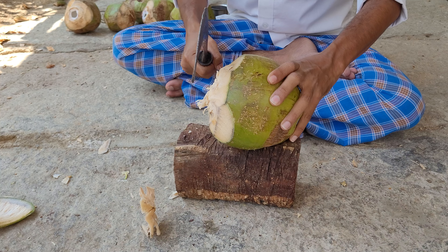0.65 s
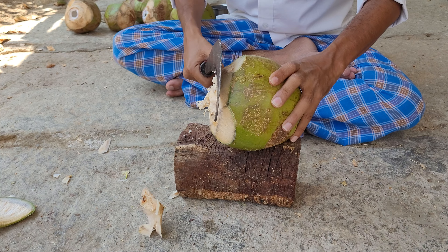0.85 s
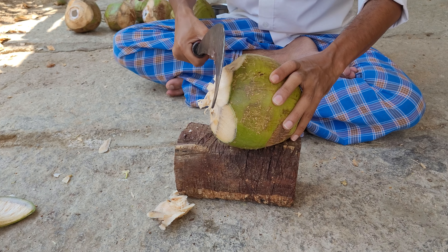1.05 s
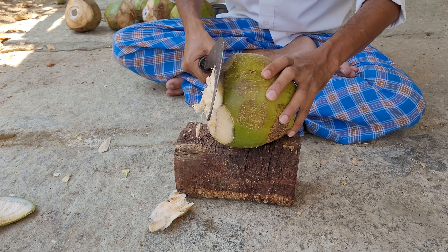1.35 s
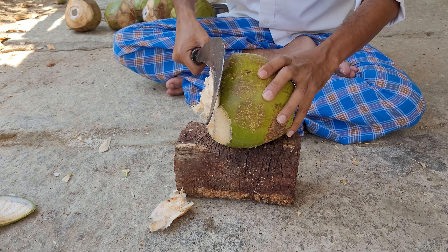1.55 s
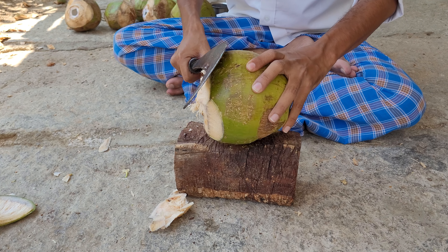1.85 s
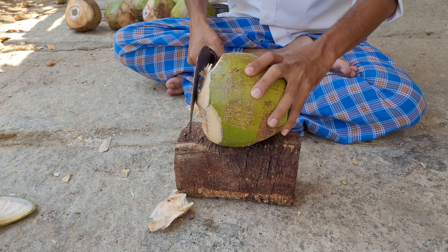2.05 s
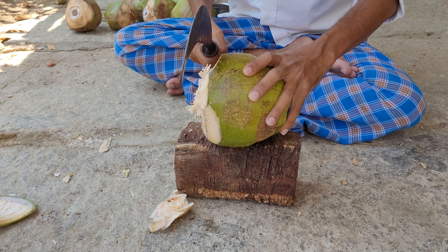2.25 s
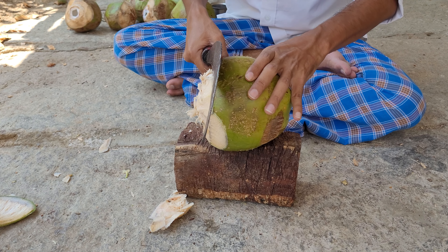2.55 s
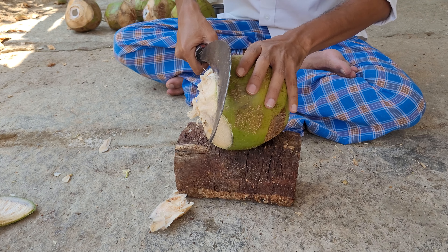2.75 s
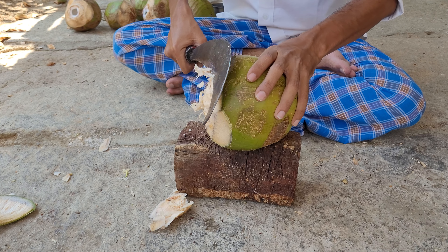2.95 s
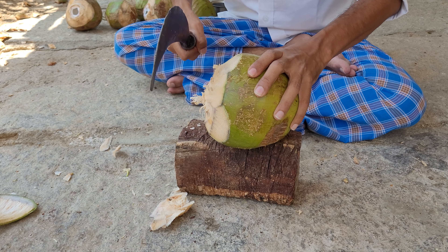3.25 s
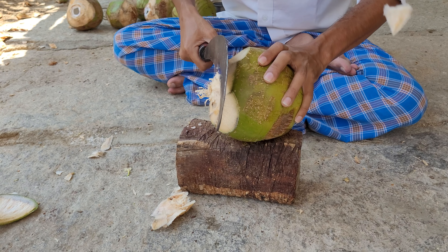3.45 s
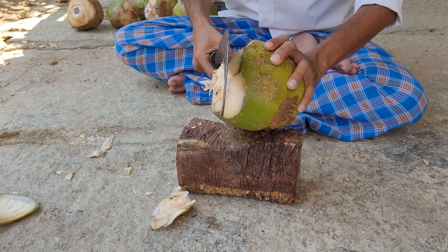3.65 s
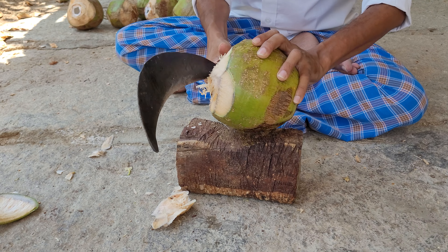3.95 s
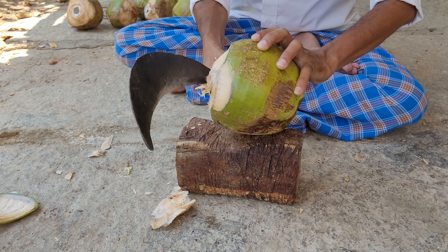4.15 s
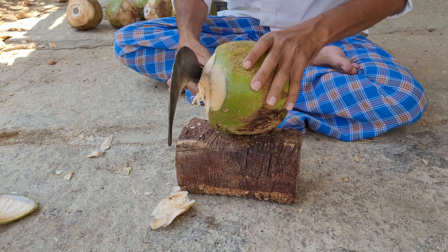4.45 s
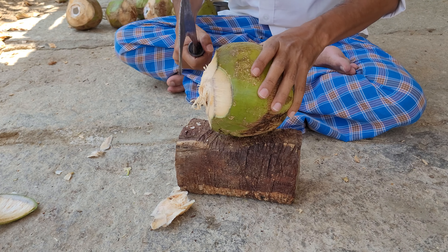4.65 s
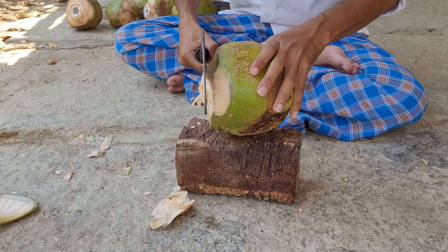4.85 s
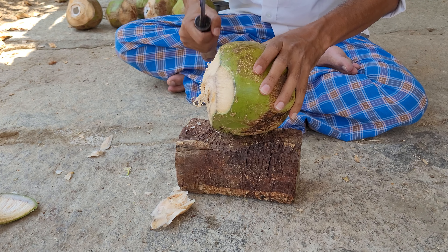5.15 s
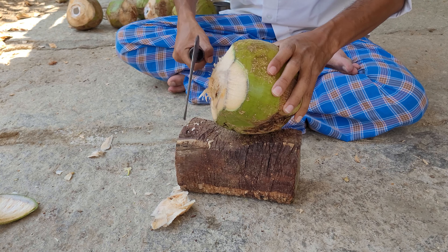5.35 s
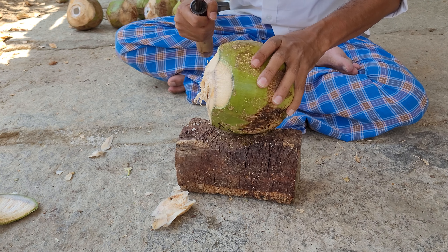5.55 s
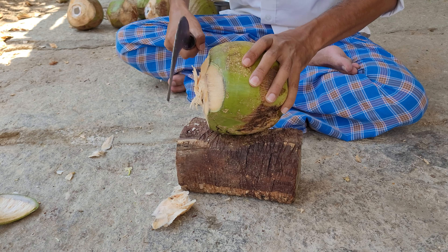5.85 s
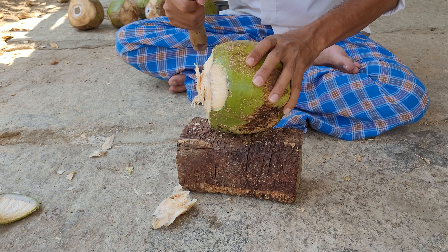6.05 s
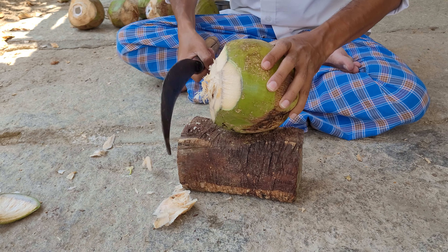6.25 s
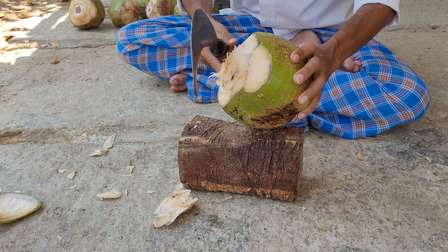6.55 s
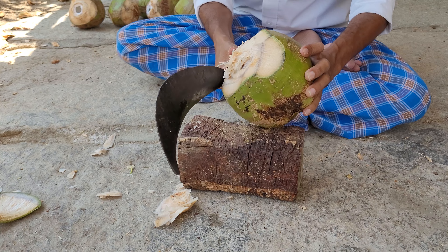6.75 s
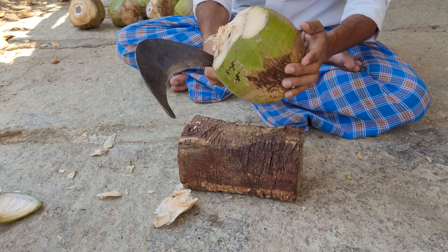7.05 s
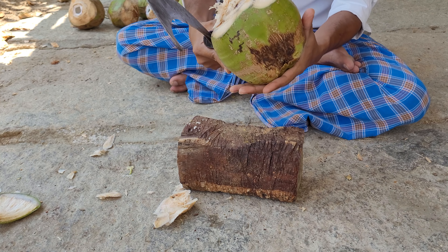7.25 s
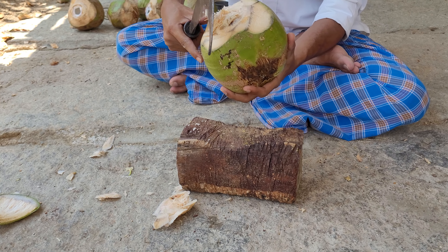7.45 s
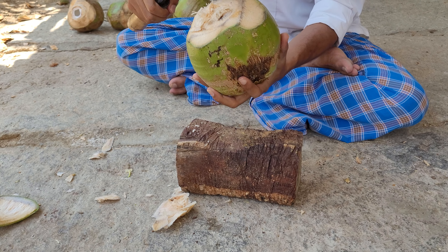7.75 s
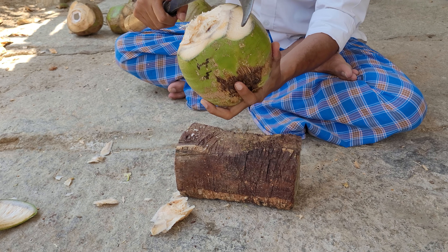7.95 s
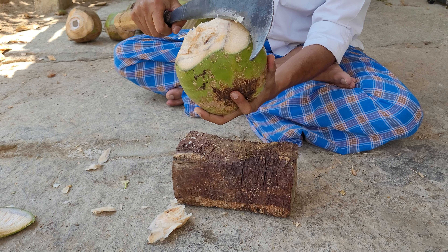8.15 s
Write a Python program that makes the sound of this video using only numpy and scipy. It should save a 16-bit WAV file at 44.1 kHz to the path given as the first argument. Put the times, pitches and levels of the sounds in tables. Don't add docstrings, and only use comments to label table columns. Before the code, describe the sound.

Close stereo microphone outdoors, dry with short wall reflections. Crisp, lumpy husk tears coincide with low hollow thuds from a liquid-filled nut and log, with brief dull steel rings. Between widely spaced cuts come fibre ticks, scrapes and soft rustles. The nut is turned near the end as fibres crackle. Distant chirps, traffic and a brief winding motor remain behind.

```python
import sys
import numpy as np
from scipy import signal
from scipy.fft import rfft, irfft, next_fast_len
from scipy.io import wavfile
from scipy.ndimage import uniform_filter1d, map_coordinates

SR = 44100
rng = np.random.default_rng(int(sys.argv[2]) if len(sys.argv) > 2 else 0)


def digitize_waveform(pressure):
    field = np.atleast_2d(pressure).T
    bounded = np.clip(field, -1, 1)
    quanta = np.round(bounded * 32767).astype(np.int16)
    wavfile.write(sys.argv[1], SR, quanta)


def volts_from_decibels(level):
    exponent = np.asarray(level, float) / 20
    return 10 ** exponent


N = 366471

# t/s, peak/dB, sizzle above 8 kHz/dB, dull part/dB, after-splitting/dB
DEEP_CUTS = [
    (0.2307, -4, -12.5, -19.5, -10.5),
]
QUICK_CUTS = [
    (1.3372, -14.5, -12.5, -12, -12),
    (3.0732, -15, -17, -10, -10.5),
    (5.2646, -11, -13.5, -4, -9.5),
    (6.242, -14.5, -17.5, -18.5, -16),
]
SLICES = [
    (5.234, -17.5, -12, -8.5, -19.5),
    (5.703, -23.5, -7.5, -10.5, -2.5),
    (5.7071, -21, -10, -14.5, -7),
    (6.2026, -31, -6.5, -11, -10),
]
GRAZES = [
    (3.5085, -26.5, -11, -18, -20),
    (6.1968, -27, -8, -11.5, -10.5),
    (8.1184, -30, -16, -10, -5.5),
]
# rise/s, t60/s
TEARING = [
    (.004, 0.012),
    (0.0013, 0.015),
    (.0032, 0.04),
    (.006, .03),
]
# f/Hz, density/dB
BITE_COLOUR = [(1180, -48.5), (2000, -13.5), (2830, -8.5), (2970, -4.5), (3230, -16), (3590, -1),
               (4450, -0.5), (5650, -7), (9000, -20), (11700, -64.5), (19800, -120)]
SIZZLE_COLOUR = [(4410, -24.5), (7500, -19), (10100, -3), (13700, -4), (15700, -9), (16300, -15),
                 (16500, -40)]
DULL_COLOUR = [(500, -24.5), (900, 12.5), (1500, 10), (2300, -2), (3200, -37.5)]

# t/s, peak/dB, shell/dB, hollow knock/dB, log boom/dB
FREE_BLOWS = [(0.231, -26, -10.5, -19, -1.5), (1.049, -63.5, 3, 9.5, -19),
              (1.339, -22.5, -12.5, -17.5, -2.5), (2.985, -46, -6.5, -12, 0.5), (3.073, -30, 9, 0.5, -9),
              (3.497, -58.5, 8, -10, -1.5), (4.246, -46.5, 1, -5, -8), (4.3, -54, -1, 4, -21),
              (5.237, -42.5, 8, 7, 3.5), (5.265, -20.5, -0.5, 4.5, -7.5), (5.704, -41.5, 3.5, -4, -1.5),
              (6.956, -55.5, -17, -5, -34.5)]
PRESSED_BLOWS = [(0.8, -47, 4, 0, 2), (2.437, -48, -26, -6.5, -11.5), (3.078, -25, 0.5, 2.5, -7.5),
                 (5.759, -46, 4.5, -9, -10), (5.797, -50, 12.5, -12, -12), (6.1956, -40, 5.5, 0, -3),
                 (6.243, -21.5, 0.5, 1.5, -13), (8.118, -56.5, 6.5, 8, 3.5), (7.09, -57.5, 0.5, -5, -14),
                 (7.2, -60.5, -5, -8, -12), (4.8, -59.5, 0, -5, 1)]
FREE_DAMPING, PRESSED_DAMPING = 0.74, 1.23
# f/Hz, level/dB, t60/s
NUT_MODES = [(134.9, -11, 0.38), (136.2, -2.5, 0.18), (134, -25, 1.1)]
SHELL_MODES = [(249.7, 2.5, 0.16), (323, -0.5, 0.079), (344, 1.5, 0.054), (387, 7.5, 0.086), (434, -2, .08)]
HOLLOW_MODES = [(485, 6.5, 0.13), (592, 3.5, 0.074), (679.5, 8.5, 0.024), (748, 0.5, 0.096),
                (774, -11, 0.046), (977, -4.5, 0.13), (1294, -17, 0.028)]
LOG_MODES = [(63.3, -11, 0.61), (83.5, -1, 0.28)]
# f/Hz, density/dB
KNOCK_COLOUR = [(350, -28.5), (520, 2), (700, 2.5), (1000, -2), (1400, -10), (2000, -24)]
THUD_COLOUR = [(120, -23.5), (190, 1), (300, 6), (450, -13.5), (650, -8)]
# delay/s, nut/dB, log/dB
WALLS = [
    (.094, -11, -9.5),
    (.132, -25.5, -20),
    (.172, -27.5, -32),
    (.21, -38, -24.5),
]
# f/Hz, t60/s
YARD_DECAY = [(150, 0.34), (1000, 0.22), (4000, 0.16), (12000, 0.11)]

# t/s, peak/dB, f/Hz, t60/s
POPS = [
    (3.0722, -11.5, 560, .012),
    (3.0768, -4, 428, 0.012),
    (5.2655, -4, 700, .012),
    (5.2335, -27, 1100, .015),
    (8.1325, -33, 650, 0.0094),
    (8.028, -46, 250, .03),
    (8.089, -45, 290, 0.025),
    (6.2445, -15, 530, 0.013),
    (1.3375, -26, 327, 0.022),
]
# t/s, level/dB, t60/s
SPLIT = (5.275, -27, 0.29)
# f/Hz, density/dB
SPLINTER_COLOUR = [(300, -20), (500, -3), (800, 0.5), (1500, -1.5), (1800, -20.5)]
# peak t/s, peak/dB, rise/s, fall/s
TURNS = [
    (7.1, -60.5, 0.23, 0.28),
    (8.09, -59, 0.11, 0.095),
]

# t/s, peak/dB, f/Hz, spit above 8 kHz/dB
SNAPS = [(0.5335, -37.5, 5140, -14.5), (0.7974, -43, 7290, -1.5), (0.8037, -32.5, 5050, -22),
         (0.833, -40.5, 3930, -14), (1.555, -42.5, 4620, -33), (1.701, -44, 3580, -29),
         (3.6855, -47.5, 10000, -2), (3.677, -58, 10300, -3), (4.036, -50, 11460, -3),
         (4.94, -45, 5400, -20), (6.269, -40, 5000, 5), (2.0697, -45, 3790, -18.5),
         (2.8374, -37, 4080, -10.5), (2.8667, -44, 4360, -9), (2.8727, -41, 4780, -8),
         (2.888, -42, 4900, -8), (2.902, -42, 4500, -6), (2.947, -48, 4600, 3), (3.0483, -34, 4450, -6),
         (3.054, -37, 4900, -7.5), (3.062, -38, 4300, -10), (2.9831, -42, 4730, -5),
         (3.0185, -29, 3800, -14), (3.0196, -31.5, 4650, -14), (3.1637, -31.5, 5410, -14),
         (3.5444, -39.5, 4330, -19), (4.7966, -31.5, 3870, -9.5), (6.538, -51, 5300, -28),
         (6.957, -41.5, 4320, -17)]
TORN_STRIP = [(7.0825, -52, 6200, 10), (7.0856, -42, 6240, 10), (7.0877, -45, 6000, 10),
              (7.094, -47, 6100, 12), (7.102, -47, 5000, 12), (7.1061, -33.5, 3700, 17.5),
              (7.11, -48, 5000, 12), (7.1165, -48, 5000, 12), (7.1192, -44, 5200, 13),
              (7.1235, -48, 3600, 12), (7.1326, -45, 3560, 6), (7.1378, -30, 4200, -10),
              (7.141, -42, 4000, 6), (7.1476, -26, 4180, -16), (7.1638, -23, 4100, -26),
              (7.167, -25, 3540, -25), (7.1706, -27, 3800, -23)]
# f/Hz, density/dB
SPIT_COLOUR = [(5000, -21), (6800, -16), (8100, -25), (9400, -11), (13100, 0), (15900, -6), (16700, -14)]
# t/s, peak/dB
KNUCKLE = [
    (3.837, -16.5),
]
# f/Hz, level/dB
DRY_COLOUR = [(88, -34), (150, 3), (1980, -4), (4620, -12), (5830, -15), (6890, -11.5), (8000, -22),
              (9600, -17), (12500, -26), (17600, -120)]
# t/s, f/Hz, level/dB, t60/s
STEEL = [(0.798, 7100, -55, .15), (1.337, 2930, -20, .017), (2.865, 7100, -62.5, .15),
         (2.983, 4770, -44, .12), (2.983, 3630, -49, .063), (2.99, 7160, -62, .15), (3.02, 2750, -56, .1),
         (3.073, 4290, -16, .016), (3.073, 5780, -16.5, .016), (3.135, 5500, -50, 0.36),
         (3.168, 11000, -43, .09), (3.168, 12800, -43, .08), (3.51, 7070, -52, .21),
         (4.945, 4600, -53, 0.13), (5.241, 6990, -32.5, .22), (5.82, 7050, -59, .33),
         (6.1965, 4110, -23, .012), (6.2413, 4130, -18.5, 0.039), (6.2415, 5350, -22, .03),
         (6.242, 12100, -23, 0.048), (8.119, 4400, -34, .03),
         (.2312, 3800, -5, .013),
    (.2314, 4400, -9, .011),
]

# peak t/s, peak/dB, rise/s, fall/s
SCRAPES = [
    (1.75, -71, 0.043, 0.14),
    (2.085, -55, 0.029, 0.051),
    (3.175, -57.5, 0.08, 0.034),
    (3.53, -57.5, .02, 0.049),
    (4.805, -52.5, 0.017, 0.041),
    (7.18, -70, .05, 0.2),
    (8.16, -75, .03, 0.054),
]
RUSTLES = [(2.01, -68.5, 0.21, 0.065), (2.45, -67.5, 0.069, 0.17), (2.67, -68, 0.11, 0.14),
           (3.68, -74, 0.11, 0.36), (4.02, -62, .17, 0.095), (4.29, -63, 0.13, 0.1),
           (4.42, -72.5, 0.073, 0.21), (4.76, -74.5, .02, 0.041), (6.846, -63.5, 0.045, 0.086),
           (7.46, -75.5, 0.35, 0.16), (7.65, -76, 0.084, .5)]
# t/s, level/dB
PRYING = [
    (2.834, -71),
    (2.84, -56.5),
    (2.885, -52),
    (2.93, -54.5),
    (2.97, -57.5),
    (3.02, -53.5),
    (3.035, -53),
    (3.053, -45.5),
    (3.066, -51.5),
    (3.072, -60.5),
]
# f/Hz, density/dB
DRAG_COLOUR = [(410, -21.5), (700, -14), (1470, -21), (1590, -18), (2180, -15.5), (4700, -5.5), (5580, -12),
               (12500, -10), (15700, -15), (16500, -38.5)]
FADE_DB = 20

# delay/s, length/s, first f/Hz, last f/Hz, level/dB
WHIP = [(0.0011, .07, 5600, 5105, -1), (0.061, .045, 3850, 4900, 4), (.045, .022, 6900, 3900, -3),
        (0.098, 0.072, 4900, 4860, -1)]
DROP = [(0, 0.0438, 4570, 4190, 0.19), (.025, 0.06, 4314, 2666, 0.88)]
CHIRP = [(-.045, 0.026, 5640, 4120, -5), (.005, .045, 4180, 4130, 0), (.025, 0.038, 3850, 3490, -3)]
STEPS = [(0, .025, 4800, 4100, 2), (.03, .05, 3544, 3570, 3.5), (.085, .05, 3150, 2950, 4)]
RISE = [(0, 0.057, 4710, 6030, 2), (0.058, 0.061, 5490, 5700, -4)]
# t/s, level/dB
WHIP_TIMES = [(1.655, -59), (4.125, -57.5), (6.63, -58.5)]
DROP_TIMES = [(2.25, -60.5), (4.553, -60), (7.444, -59.5)]
CHIRP_TIMES = [(.002, -59), (1.03, -54.5), (2.68, -55.5), (3.44, -52.5), (4.995, -58), (5.455, -56),
               (8.19, -51), (1.36, -53.5), (7.15, -57)]
STEPS_TIMES = [(.36, -65.5), (3.73, -63.5), (7.78, -63.5)]
RISE_TIMES = [(5.871, -63)]

# t/s, level/dB, f/Hz
MOTOR = [
    (4.45, -75.5, 706),
    (4.614, -72, 661),
    (4.764, -61.5, 748),
    (5.2, -67.5, 723),
]
# t/s, level/dB
HUM_LEVEL = [(0, -60), (.56, -62.5), (1.2, -61.5), (2.1, -61.5), (3.2, -59.5), (4.8, -60.5), (6.1, -64.5),
             (7, -59.5), (8.31, -60.5)]
# f/Hz, density/dB
HUM_COLOUR = [(18, -43.5), (30, -22), (101, -8), (206, -7), (255, -5), (467, -2.5), (547, -7.5),
              (772, -9.5), (953, -12), (1530, -11.5), (3570, -12.5), (4650, -11.5), (7670, -31),
              (12000, -27), (15600, -39), (16000, -60.5)]
# f/Hz, width/Hz, level/dB
WHINES = [(1570, 110, -65.5), (4560, 110, -76), (2038, 420, -65), (9700, 540, -82)]
# peak t/s, peak/dB, rise/s, fall/s
RUMBLE_SWELLS = [
    (.3, -71.5, 0.13, 0.21),
    (1.39, -53, 0.15, 0.26),
    (3.33, -74.5, 0.36, 4.4),
    (5.28, -81, 0.27, 0.59),
    (8.31, -54, 0.33, 0.49),
]
RUMBLE_FLOOR_DB = -81.5
# f/Hz, likeness/1
LIKENESS = [(60, 0.29), (200, 1), (700, 0.49), (1500, 0.16), (3000, 0.61), (7000, 0.36)]
# f/Hz, width/Hz, level/dB
PORT_RESONANCE = (4300, 2000, 6)


def unit(x):
    return x / np.sqrt(np.mean(x ** 2) + 1e-20)


def along(points, hz):
    f, v = np.transpose(points)
    return np.interp(np.log(hz + 1), np.log(f + 1), v)


def curve(rows, axis, off=None):
    rows = np.asarray(rows)
    return np.interp(np.arange(N) / SR, rows[:, 0], rows[:, axis], off, off)


def wobble(rate_hz):
    knots = rng.standard_normal(int(N * rate_hz / SR) + 4)
    return map_coordinates(knots, [np.arange(N) * rate_hz / SR])


def filtered(x, response):
    m = next_fast_len(x.shape[-1] + 4096)
    return irfft(rfft(x, m) * response(np.fft.rfftfreq(m, 1 / SR)), m)[..., :x.shape[-1]]


def hiss(colour, size):
    points = [(0.71, -120)] + list(colour) + [(SR / 2, -120)]
    return unit(filtered(rng.standard_normal(size), lambda hz: volts_from_decibels(along(points, hz))))


def lumpy(size, width):
    return unit(uniform_filter1d(rng.standard_normal(size), size=width))


def add(track, s, x):
    part = track[..., max(round(s * SR), 0):][..., :x.shape[-1]]
    part += x[..., :part.shape[-1]]


def swells(rows):
    t = np.arange(N) / SR
    total = np.zeros(N)
    for s, db, rise_s, fall_s in rows:
        total += volts_from_decibels(db - FADE_DB * np.maximum((s - t) / rise_s, (t - s) / fall_s))
    return total


def ring(modes, t, damping, spread_db):
    total = np.zeros(len(t))
    for hz, db, t60 in modes:
        level = volts_from_decibels(db + spread_db * rng.normal() - 60 * t * damping / t60)
        total += level * np.sin(2 * np.pi * hz * (1 + 0.018 * rng.normal()) * t)
    return total


def yard(x, stretch, size):
    hz, t, z = signal.stft(rng.standard_normal((2, size)), SR, nperseg=256)
    decay = volts_from_decibels(-60 * t / (stretch * along(YARD_DECAY, hz)[:, None]))
    tail = signal.istft(z * decay, SR, nperseg=256)[1]
    return signal.fftconvolve(x[None], tail / np.linalg.norm(tail[0]), axes=1)


def cuts():
    out, t = np.zeros((2, N)), np.arange(SR // 4) / SR
    strokes = zip((DEEP_CUTS, QUICK_CUTS, SLICES, GRAZES), TEARING)
    rows = [(*row, *kind) for table, kind in strokes for row in table]
    for s, db, sizzle_db, dull_db, after_db, rise_s, t60 in rows:
        age = np.maximum(t - rise_s, 0)
        attack = np.clip(t / rise_s, 0, 1)
        shape = attack ** 2 * (volts_from_decibels(-60 * age / t60) + volts_from_decibels(after_db - 60 * age / 0.15))
        lumps = volts_from_decibels(2.5 * lumpy(len(t), 70))
        bite, sizzle, dull = (hiss(c, (3, len(t))) for c in (BITE_COLOUR, SIZZLE_COLOUR, DULL_COLOUR))
        tear = shape * (bite + volts_from_decibels(sizzle_db + 8.0) * sizzle)
        tear = tear + volts_from_decibels(dull_db - 2.5 - 60 * age / 0.1) * attack * dull
        burst = volts_from_decibels(db - 8.5) * lumps * (tear[0] + 1.035 * tear[1:])
        add(out, s - rise_s / 2, burst)
        add(out, s + 0.0043, volts_from_decibels(-10) * yard(burst[0], 1.73, size=SR // 4))
        add(out, s + 0.092, volts_from_decibels(-34) * yard(burst[1], 0.57, size=SR // 8))
    return out


def thumps():
    out, t = np.zeros((2, N)), np.arange(SR // 2) / SR
    onset = 1 - np.exp(-t / 0.0019)
    grip = volts_from_decibels(-15 / (1 + np.exp((0.05 - t) / 0.0023)))
    echo = np.sin(np.pi * np.clip(t / 0.03, 0, 1)) ** 2
    rows = [(*row, FREE_DAMPING) for row in FREE_BLOWS]
    rows += [(*row, PRESSED_DAMPING) for row in PRESSED_BLOWS]
    for s, db, shell_db, hollow_db, log_db, damping in rows:
        bodies = (NUT_MODES, LOG_MODES, SHELL_MODES, HOLLOW_MODES)
        nut, log, shell, hollow = (ring(modes, t, damping, 1.2) for modes in bodies)
        water = unit(uniform_filter1d(lumpy(len(t), 900), size=900))
        slosh = volts_from_decibels(5.4 * np.clip(t / 0.1, 0, 1) * water)
        nut = volts_from_decibels(db + 5.0) * grip * slosh * nut
        log = volts_from_decibels(db + log_db + 3.0) * grip ** 0.7 * log
        low = nut + log
        knock = (0.5 + 1.2 * volts_from_decibels(-60 * t / 0.067)) * hollow
        knock = knock + volts_from_decibels(2.5 - 60 * t * damping / 0.083) * hiss(KNOCK_COLOUR, len(t))
        thud = shell + volts_from_decibels(2.5 - 60 * t * damping / 0.13) * hiss(THUD_COLOUR, len(t))
        high = volts_from_decibels(db + shell_db - 3.5) * thud + volts_from_decibels(db + hollow_db - 9.5) * knock
        add(out, s, onset * (low + high))
        add(out, s + 0.00419, yard(onset * (volts_from_decibels(-9) * high + volts_from_decibels(-22) * low), 1.22, size=SR // 4))
        for late_s, nut_db, boom_db in WALLS:
            returned = volts_from_decibels(nut_db) * (nut + volts_from_decibels(-9.5) * high) + volts_from_decibels(boom_db) * log
            add(out, s + late_s, echo * returned)
    return out


def pops():
    out, t = np.zeros((2, N)), np.arange(SR // 20) / SR
    for s, db, hz, t60 in POPS:
        level = volts_from_decibels(db + 4 - 60 * t / t60) * (1 - np.exp(-t / 0.0006))
        pop = -level * np.sin(2 * np.pi * hz * t)
        add(out, s, pop)
        add(out, s + 0.004, volts_from_decibels(-8.5) * yard(pop, 1.1, size=SR // 8))
    return out


def husk():
    s, db, t60 = SPLIT
    age = np.arange(N) / SR - s
    level = (age > 0) * volts_from_decibels(db - 60 * np.abs(age) / t60 + 2 * wobble(180))
    split = level * (hiss(SPLINTER_COLOUR, N) + 0.5 * hiss(SPLINTER_COLOUR, (2, N)))
    return split + swells(TURNS) * volts_from_decibels(4.5 * wobble(30)) * hiss(THUD_COLOUR, N)


def blade():
    out, t = np.zeros(N), np.arange(SR // 4) / SR
    for s, hz, db, t60 in STEEL:
        beat = 1 + 0.408 * np.sin(2 * np.pi * rng.uniform(39.84, 90) * t)
        level = volts_from_decibels(db - 60 * t / t60) * (1 - np.exp(-t / 0.00069))
        add(out, s, level * beat * np.sin(2 * np.pi * hz * t))
    return out


def impulse(colour, at, size):
    points = [(1, -120)] + colour
    click = filtered(np.arange(size) == at, lambda hz: volts_from_decibels(along(points, hz)))
    return click / click.max()


def snaps():
    out, t = np.zeros((2, N)), np.arange(SR // 40) / SR
    release = impulse(SPIT_COLOUR + [(17500, -60)], 40, len(t))
    # spit colour, t60/s, click share, yard/dB
    rows = [(*row, SIZZLE_COLOUR, 0.006, 0, -8) for row in SNAPS]
    rows += [(*row, SPIT_COLOUR, 0.0038, 1, -12) for row in TORN_STRIP]
    for s, db, hz, spit_db, colour, t60, click_share, yard_db in rows:
        tick = volts_from_decibels(-60 * t / t60) * (np.sin(2 * np.pi * hz * t) + 0.4 * hiss(BITE_COLOUR, len(t)))
        spit = volts_from_decibels(spit_db + 7.5 - 60 * t / 0.0043) * hiss(colour, len(t))
        crack = volts_from_decibels(db + 6.5) * (1 - np.exp(-t / 0.00074)) * (tick + spit)
        crack = crack + click_share * volts_from_decibels(db + spit_db + 2.5) * release
        add(out, s, crack)
        add(out, s + 0.0021, volts_from_decibels(yard_db) * yard(crack, 0.9, size=SR // 8))
    for s, db in KNUCKLE:
        click = impulse(DRY_COLOUR, len(t) // 2, len(t))
        add(out, s - t[-1] / 2 + 0.00088, volts_from_decibels(db) * click)
    return out


def scrapes():
    slips = volts_from_decibels(2.6 * wobble(900) + 1.2 * wobble(60))
    drag = unit(slips * (hiss(DRAG_COLOUR, N) + 0.49 * hiss(DRAG_COLOUR, (2, N))))
    strokes = volts_from_decibels(2.2 * wobble(700) + 2.5 * wobble(26))
    brush = unit(strokes * (hiss(SIZZLE_COLOUR, N) + 0.89 * hiss(SIZZLE_COLOUR, (2, N))))
    drag_level = swells(SCRAPES) + volts_from_decibels(curve(PRYING, axis=1, off=-150))
    return volts_from_decibels(7.0) * drag_level * drag + volts_from_decibels(5.0) * swells(RUSTLES) * brush


def birds():
    out = np.zeros((2, N))
    phrases = (WHIP, DROP, CHIRP, STEPS, RISE)
    times = (WHIP_TIMES, DROP_TIMES, CHIRP_TIMES, STEPS_TIMES, RISE_TIMES)
    song = [(s, db, phrase) for phrase, sung in zip(phrases, times) for s, db in sung]
    for s, db, phrase in song:
        for late_s, length_s, first_hz, last_hz, note_db in phrase:
            u = np.linspace(0, 1, int(length_s * SR))
            rasp_hz = 175 * lumpy(len(u), 90)
            glide_hz = first_hz + (last_hz - first_hz) * (1 - np.cos(np.pi * u)) / 2
            voice = np.sin(2 * np.pi * np.cumsum(glide_hz + rasp_hz) / SR)
            call = volts_from_decibels(db + note_db) * np.sin(np.pi * u) ** 0.5 * voice
            add(out, s + late_s, volts_from_decibels(-9) * call)
            add(out, s + late_s, volts_from_decibels(7.5) * yard(call, 3.1, size=SR // 2))
    return out


def motor():
    whine = np.sin(2 * np.pi * np.cumsum(curve(MOTOR, axis=2) + 25 * wobble(37)) / SR)
    rush = hiss([(450, -7), (600, -9), (950, -7), (1200, -34)], (2, N))
    return volts_from_decibels(curve(MOTOR, axis=1, off=-150)) * (0.72 * whine + 0.92 * rush)


def background():
    hum = hiss(HUM_COLOUR, (2, N)) * volts_from_decibels(curve(HUM_LEVEL, axis=1) + 2.0 + 0.58 * wobble(4.9))
    rumble_level = (volts_from_decibels(RUMBLE_FLOOR_DB) + swells(RUMBLE_SWELLS)) * volts_from_decibels(3 * wobble(2.4))
    rumble = hiss([(22, -11.5), (35, -4), (55, 0.5), (75, -21)], (2, N)) * rumble_level
    for c, w, db in WHINES:
        sway_db = 1.5 * wobble(8.5)
        band = [(c - 2 * w, -40), (c - w / 2, -3), (c, 0), (c + w / 2, -3), (c + 2 * w, -40)]
        hum = hum + volts_from_decibels(db + sway_db) * hiss(band, (2, N))

    def mid_side(hz):
        angle = np.arccos(np.clip(along(LIKENESS, hz), 0, 1)) / 2
        return np.array([np.cos(angle), np.sin(angle)])

    mid, side = filtered(hum + rumble, mid_side)
    return np.array([mid + side, np.roll(mid - side, 10)])


def scene():
    chopping = cuts() + thumps() + pops() + husk() + blade()
    handling = snaps() + scrapes()
    return chopping + handling + birds() + motor() + background()


def top_cut(x):
    return signal.sosfilt(signal.butter(12, 16810, fs=SR, output="sos"), x)


def record(dry):
    c, w, db = PORT_RESONANCE

    def ports(f):
        peak = 1 + volts_from_decibels(db) * 1j * f * w / (c * c - f * f + 1j * f * w)
        bass_cut = (1j * f / 60) ** 2 / (1 + 1.2j * f / 60 - (f / 60) ** 2)
        delay_s = 2e-5 + 2.5e-5 / (1 + (f / 3000) ** 2)
        left = volts_from_decibels(-1.22) * peak ** -1.15
        right = volts_from_decibels(0.37) * peak ** 0.16 * np.exp(-2j * np.pi * f * delay_s)
        return bass_cut * np.array([left, right])

    clipped = np.clip(filtered(dry, ports), -1, 1)
    return top_cut(filtered(clipped, lambda f: f < 16750))


dry = scene()
out = record(dry)
digitize_waveform(out)
```